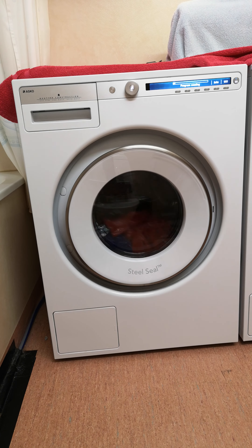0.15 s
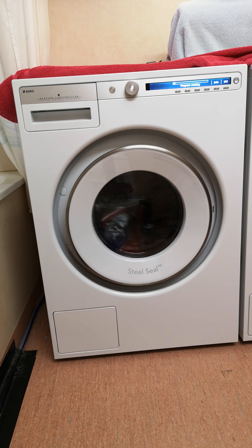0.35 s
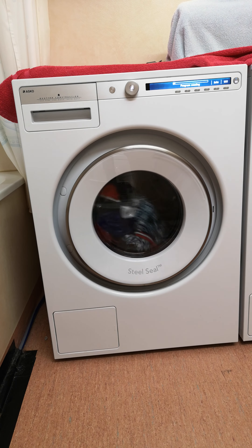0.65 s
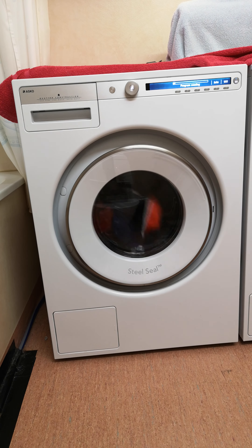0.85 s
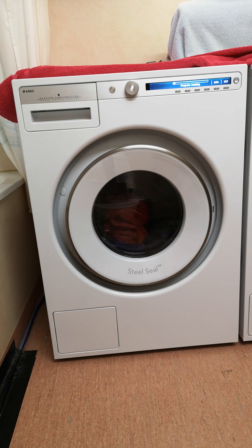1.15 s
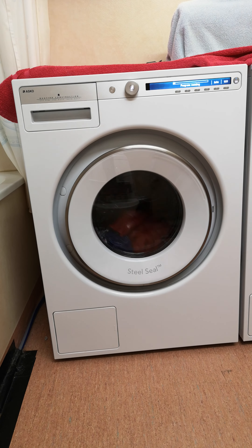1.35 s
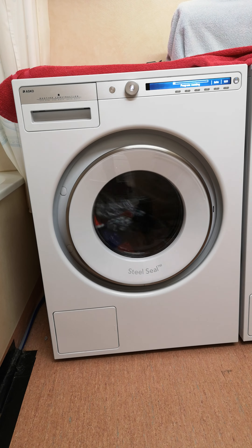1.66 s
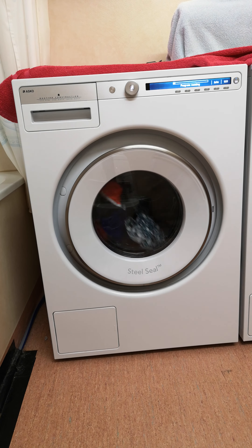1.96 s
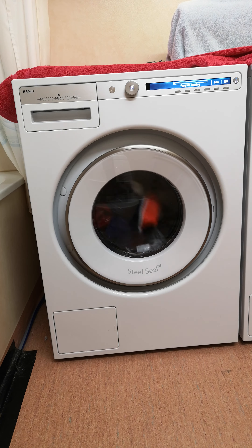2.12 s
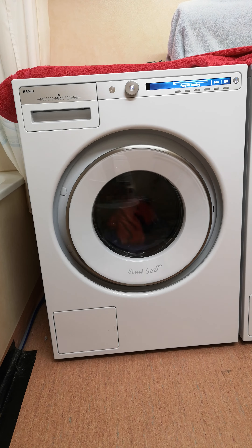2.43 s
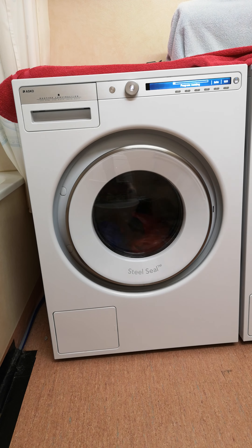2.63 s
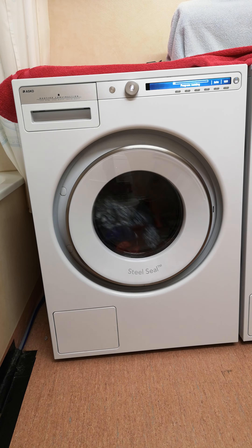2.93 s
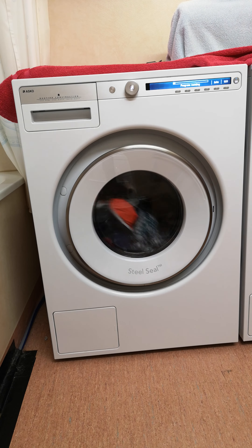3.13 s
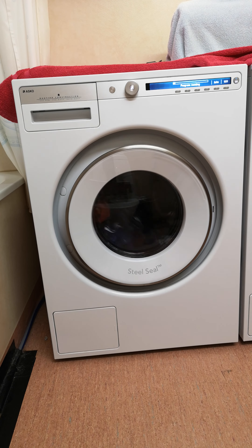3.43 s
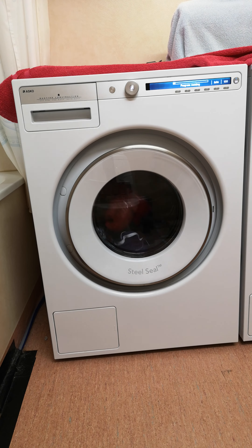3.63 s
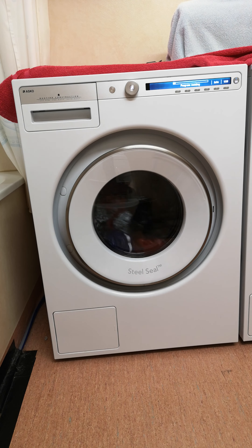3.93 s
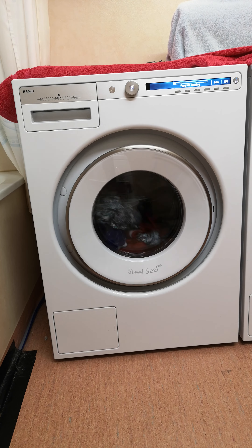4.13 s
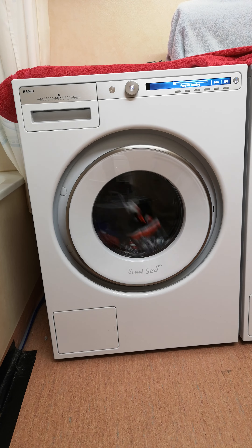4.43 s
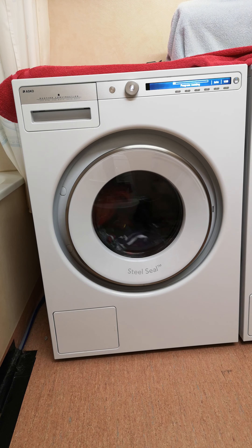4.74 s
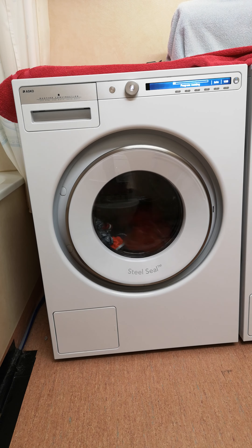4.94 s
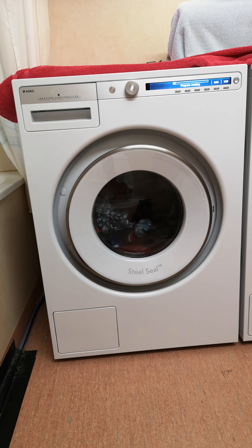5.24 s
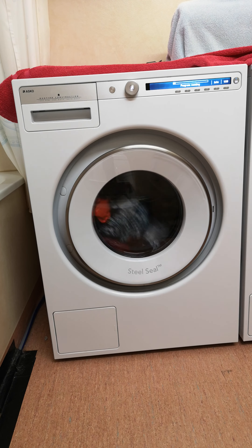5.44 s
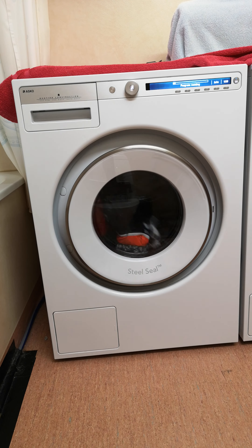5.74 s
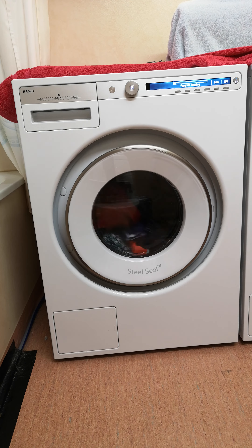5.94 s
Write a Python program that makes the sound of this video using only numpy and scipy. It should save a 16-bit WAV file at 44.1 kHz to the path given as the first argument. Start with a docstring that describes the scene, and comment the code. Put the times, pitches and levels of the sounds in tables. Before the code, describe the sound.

Close, small-room sound of a front-loader tumbling wet clothes. Rounded gurgling swishes rise and ebb irregularly without a real pause, muffled by the door and cabinet. Soft cloth thuds and a few flat slaps punctuate them, with the tub sometimes rocking in a brief low bump. Beneath is a constant deep electrical hum and rumble; above, a faint watery hiss. The machine leans clearly to the right, with a darker left side.

```python
"""A front-loading washing machine tumbles wet laundry, heard from a step away in a small room.
Water swishes and bubbles: noise and short rising rings, muffled by door and cabinet.
The motor hums in steady tones and the turning drum adds a low rumble under a fine hiss of spray.
Wet laundry thuds, slaps, and gives short squeaks and hisses, all brief swells of noise.
At times the tub rocks on its springs: a few deep cycles."""
import sys
import numpy as np
from scipy import signal
from scipy.fft import rfft, irfft, next_fast_len
from scipy.io import wavfile
from scipy.ndimage import uniform_filter1d

SR = 44100
rng = np.random.default_rng(int(sys.argv[2]) if len(sys.argv) > 2 else 0)


def generate_wav(sig):
    """Save sig (samples, or channels by samples) to the path in sys.argv[1] as 16-bit PCM at SR."""
    pcm = np.round(np.clip(np.atleast_2d(sig).T, -1, 1) * 32767).astype(np.int16)
    wavfile.write(sys.argv[1], SR, pcm)


N = 267863

# strength of the motor hum as the load shifts: time_s, level_db
HUM_LEVELS = [(0.0, -44), (0.03, -44.5), (0.15, -41.5), (0.56, -43), (0.78, -41), (1.0, -43.5), (1.05, -41),
              (2.23, -46.5), (2.45, -41.5), (2.65, -46), (3.35, -41), (3.46, -45.5), (3.9, -41.5),
              (4.11, -45.5), (4.22, -42.5), (4.33, -49.5), (4.45, -42), (4.8, -43.5), (4.87, -48),
              (4.99, -42.5), (5.17, -40.5), (5.9, -44), (5.97, -39.5), (6.07, -42)]
# weaker steady tones of the hum: multiple_of_mains_rate, level_db
HUM_LINES = [(1, -64.5), (4, -68.5), (6, -57.5)]
# laundry plunging through water: peak_s, gurgle_level_db, ebb_s (time to fall 10 dB), splash_above_gurgle_db
SWISHES = [(0.165, -40, 0.073, -3.5), (0.335, -51.5, 0.072, -2), (0.45, -35, 0.079, -12),
           (0.732, -38, 0.071, -5), (0.896, -34.5, 0.079, -9), (1.073, -38.5, 0.12, -5.5),
           (1.292, -41, 0.11, -10.5), (1.343, -35.5, 0.046, -8.5), (1.512, -50.5, 0.072, -2),
           (1.749, -39, 0.089, -8.5), (1.915, -45.5, 0.082, -6), (2.072, -52.5, 0.029, 2),
           (2.379, -36, 0.077, -8.5), (2.598, -46, 0.14, -9.5), (2.803, -43, 0.09, -9.5),
           (3.006, -49.5, 0.1, 0.5), (3.128, -37.5, 0.075, -5.5), (3.288, -43.5, 0.16, -12),
           (3.383, -49.5, 0.06, -1), (3.551, -37.5, 0.069, -10.5), (3.823, -42, 0.2, -9.5),
           (3.963, -42.5, 0.043, -10.5), (4.181, -43, 0.077, -11), (4.477, -38.5, 0.044, -4.5),
           (4.557, -42.5, 0.12, -7.5), (4.717, -37.5, 0.069, -5), (4.992, -43, 0.089, -4.5),
           (5.2, -42, 0.28, -13), (5.305, -43, 0.063, -6.5), (5.475, -43.5, 0.079, -9),
           (5.632, -37.5, 0.073, -4.5), (5.874, -32, 0.033, -9.5), (5.925, -41.5, 0.19, -8),
           (6.057, -41.5, 0.066, -6.5)]
# what the closed machine lets through of the water's noise: frequency_hz, gain_db
CABINET = [(30, -32), (85, -11), (140, 0.5), (200, -2), (265, 2.5), (450, -0.5), (800, 2.5), (1100, -10.5),
           (1900, -12.5), (2050, -17.5), (2650, -18.5), (3200, -34), (5000, -41), (12000, -57.5)]
# resonances and hollows of tub, door and panels: frequency_hz, width_hz, lift_db
PANELS = [(116, 11, -1), (159, 4.9, -2.5), (223.4, 21.5, -13.5), (281, 81, 4.5), (320.4, 3.6, -8),
          (575, 14, -2), (618, 11, -4), (722, 250, 2), (787, 38, 2.5), (940, 19, -1), (1036, 40, -0.5),
          (1183, 8.4, 0.5), (1251, 47, 2.5), (1329, 70, -5), (1414, 21, 3.5), (1496, 6.6, 7.5),
          (1550, 65, 3), (1725, 68, 7.5), (1831, 28.5, 11.5), (1952, 57, 2.5), (2610, 140, 4.5),
          (3210, 70, 10.5), (3690, 61, 10.5)]
# colour of the drum's rumble: frequency_hz, gain_db
RUMBLE_COLOUR = [(10, -9), (30, -15), (42, -13), (50, -0.5), (62, -8.5), (75, -2.5), (86, 2), (100, -2),
                 (112, -11), (145, -6), (200, -28), (500, -59)]
# colour of the spray: frequency_hz, gain_db
SPRAY_COLOUR = [(100, 1), (800, 2.5), (1900, 1), (2600, 1.5), (3200, -6.5), (5500, -9), (7500, -13.5),
                (10500, -19), (16000, -17.5)]
# ringing of the steel drum under the spray: frequency_hz, width_hz, lift_db
STEEL_RINGS = [(3684, 270, 11.5), (4970, 280, 5), (9090, 730, 8.5)]
# colour of the steady background of room and microphone: frequency_hz, gain_db
BACKGROUND_COLOUR = [(20, 2), (60, 11), (200, 2), (600, -6), (2000, 3.5), (5000, -4.5), (9000, -6.5),
                     (16000, -6)]
# wet cloth landing in the drum: peak_s, level_db (before the cabinet), length_s, pitch_hz
THUDS = [(.156, -35, 0.012, 305), (.441, -42, 0.027, 325), (.894, -40, 0.018, 345),
         (1.057, -37, 0.061, 307), (1.317, -39.5, 0.02, 440), (1.467, -41, 0.024, 315),
         (2.354, -37, 0.016, 307), (2.41, -40, 0.0098, 270), (3.095, -35, .012, 294),
         (3.6, -34, 0.019, 285), (3.667, -39, .012, 264), (3.886, -50, .01, 280), (4.128, -35, 0.0071, 295),
         (4.167, -37.5, .017, 280), (4.452, -37, 0.016, 290), (4.535, -40.5, 0.026, 302),
         (4.705, -31, 0.011, 305), (4.773, -35.5, 0.0051, 310), (4.99, -36, 0.028, 293),
         (5.21, -37, 0.051, 288), (5.315, -34, 0.0073, 278), (5.741, -37.5, 0.019, 268),
         (5.867, -27, .0093, 337), (5.936, -43.5, 0.017, 338)]
# soaked cloth slapping the water: peak_s, level_db (before the panels), length_s, pitch_hz
SLAPS = [(.447, -39, 0.024, 1320), (1.328, -47.5, 0.029, 1540), (1.722, -32, 0.026, 695),
         (2.357, -38, 0.021, 1700), (3.503, -37, 0.014, 760), (4.146, -39, 0.013, 715),
         (4.443, -42, 0.013, 1260), (4.688, -42.5, 0.011, 1740), (5.595, -38, 0.017, 1790),
         (5.852, -40, 0.0053, 1090)]
# the tub rocking on its springs: peak_s, level_db
TUB_ROCKS = [(0.723, -45), (1.114, -51), (1.332, -46.5), (2.359, -54), (2.574, -54), (3.396, -49),
             (3.799, -54), (5.209, -56), (5.863, -45), (5.994, -45)]
# short squeaks and hisses of wet laundry: peak_s, level_db, length_s, pitch_hz
SQUEAKS_AND_HISSES = [(1.335, -63, 0.05, 3600), (3.77, -62.5, 0.037, 3600), (4.302, -48.5, 0.0077, 1910)]
# the far microphone port against the near one: frequency_hz, gain_db, delay_ms
FAR_PORT = [(50, 0.2, 1.0), (100, -0.3, 0.99), (200, -1.9, 0.97), (300, -3.0, 0.95), (500, -5.6, 0.85),
            (800, -9.1, 0.76), (1100, -11.5, 0.71), (1800, -16.0, 0.64), (2600, -19.9, 0.61),
            (4000, -23.4, 0.6)]

MAINS_HZ = 50
TOP_HZ = 15750  # upper edge of the whole sound
# a swish swells in this share of its ebb time, and its splash runs just ahead of the gurgle
SWELL_SHARE, ROUNDNESS, SPLASH_LEAD_S = 0.76, 1.46, 0.013
# the water keeps lapping between the swishes
LAP_GURGLE_DB, LAP_SPLASH_DB = -54, -58.5
# usual level in dB, and dB gained per dB of moving water
SWIRL_DB, SWIRL_FOLLOW = -50, 0.44
RUMBLE_DB, RUMBLE_FOLLOW = -55.5, 0.32
SPRAY_DB, SPRAY_FOLLOW = -66.5, 0.32
# how far spray leans from gurgle to splash, and how much a busy spell around it adds
SPLASH_SHARE, SPELL_S, SPELL_FOLLOW = 0.47, 0.5, 0.15

TIME = np.arange(N) / SR
SIZE = next_fast_len(N + SR // 2, real=True)  # spare room so that ringing does not wrap round
HZ = np.fft.rfftfreq(SIZE, 1 / SR)


def gain_of(db):
    """Turn decibels into a plain multiplier."""
    return 10 ** (np.asarray(db) / 20)


def evened(x):
    """Scale to unit average strength (root mean square)."""
    return x / np.sqrt(np.mean(x ** 2) + 1e-20)


def steadied(x, span_s):
    """Hold unit level over every span, with the finer grain kept."""
    power = uniform_filter1d(x ** 2, max(int(span_s * SR), 2)).clip(0)
    return x / np.sqrt(power + 1e-12)


def curves(rows):
    """Each column of a time table, at every sample."""
    times, *columns = np.transpose(rows)
    return [np.interp(TIME, times, column) for column in columns]


def spectra(rows):
    """Each column of a frequency table, joined up along a log scale of frequency."""
    hz, *columns = np.transpose(rows)
    return [np.interp(np.log(HZ + 1), np.log(hz + 1), column) for column in columns]


def lifts(rows):
    """A row of resonances as a gain curve in dB."""
    return sum(db / (1 + (2 * (HZ - hz) / width) ** 2) for hz, width, db in rows)


def filtered(x, response):
    """Change the strength (and timing) of each frequency in a sound."""
    return irfft(rfft(x, SIZE) * response, SIZE)[..., :N]


def causal(db):
    """The minimum-phase response of a gain curve: it rings after a blow, never before."""
    cepstrum = irfft(np.log(gain_of(db)), SIZE)
    cepstrum[1:SIZE // 2] *= 2
    cepstrum[SIZE // 2 + 1:] = 0
    return np.exp(rfft(cepstrum))


def wander(rate_hz):
    """Random drift of unit size, smoother for a lower rate."""
    return evened(filtered(rng.standard_normal(N), np.exp(-(HZ / rate_hz) ** 2)))


def hum():
    """Magnetic pull shakes the motor at twice the mains rate, with a few weaker tones."""
    level_db, = curves(HUM_LEVELS)
    turns = MAINS_HZ * TIME + 0.00097 * wander(1)  # mains cycles so far, very slightly uneven
    out = gain_of(level_db) * np.sin(2 * np.pi * 2 * turns)
    for multiple, db in HUM_LINES:
        tone = np.sin(2 * np.pi * (multiple * turns + rng.random()))
        out += gain_of(db + 0.67 * wander(1.8)) * tone
    return np.sqrt(2) * out  # a sine of this height has the level given


def rumble(gurgle_db):
    """The loaded drum rolls on its bearings, a little louder when the water heaves."""
    roll = steadied(filtered(rng.standard_normal(N), gain_of(spectra(RUMBLE_COLOUR)[0])), 0.37)
    return roll * gain_of(RUMBLE_DB + RUMBLE_FOLLOW * (gurgle_db - gurgle_db.mean()))


def swish(age, ebb_s):
    """Power of one swish around its peak: a rounded swell and a slower ebb."""
    away = abs(age) / (ebb_s * np.where(age < 0, SWELL_SHARE, 1))
    return 10 ** -np.minimum(away ** ROUNDNESS, 20)


def heave():
    """Level of gurgle and of splash in dB: the swishes' power on top of the steady lapping."""
    gurgle, splash = gain_of(LAP_GURGLE_DB) ** 2, gain_of(LAP_SPLASH_DB) ** 2
    t = np.linspace(0, TIME[-1], N // 64)  # a coarse clock is enough for slow levels
    for peak_s, db, ebb_s, splash_db in SWISHES:
        gurgle = gurgle + gain_of(db) ** 2 * swish(t - peak_s, ebb_s)
        splash = splash + gain_of(db + splash_db) ** 2 * swish(t - peak_s + SPLASH_LEAD_S, ebb_s)
    return [np.interp(TIME, t, 10 * np.log10(power)) for power in (gurgle, splash)]


def bubbles(per_s, cycles, glide, spread_db, count=36):
    """Short rising rings of many pitches, mostly small and now and then large."""
    out = np.zeros(N)
    for hz in np.geomspace(300, 4000, count):
        u = np.arange(int(5 * cycles / hz * SR)) / SR * hz / cycles  # age in units of the decay time
        swell_and_fade = (1 - np.exp(-8 * u)) * np.exp(-u)
        ring = swell_and_fade * np.sin(2 * np.pi * cycles * (u + glide * u ** 2))
        sizes = gain_of(spread_db * np.minimum(rng.exponential(1, N), 4))
        pops = sizes * (rng.random(N) < per_s / count / SR)
        out += np.sqrt(hz) * evened(signal.oaconvolve(pops, ring)[:N])
    return evened(out)


def water(gurgle_db, splash_db):
    """Churning noise, fine bubbles and stray plops ring the cabinet, in three bands with their own levels."""
    churn = evened(rng.standard_normal(N) * gain_of(1.33 * wander(42)))
    fizz = gain_of(-7.0) * bubbles(per_s=3500, cycles=3.4, glide=0.018, spread_db=2.5)
    plops = gain_of(-11.5) * bubbles(per_s=130, cycles=8.84, glide=0.0296, spread_db=2.5)
    sound = filtered(churn + fizz + plops, causal(spectra(CABINET)[0] + lifts(PANELS)))
    above_bass = 1 / (1 + (385 / (HZ + 1)) ** 8)
    above_middle = 1 / (1 + (1120 / (HZ + 1)) ** 8)
    swirl = steadied(filtered(sound, 1 - above_bass), 0.089)
    gurgle = steadied(filtered(sound, above_bass - above_middle), 0.071)
    splash = steadied(filtered(sound, above_middle), 0.091)
    # the deep swirl follows the heave only in part, so it never rests
    swirl_db = SWIRL_DB + SWIRL_FOLLOW * (gurgle_db - gurgle_db.mean())
    return gain_of(swirl_db) * swirl + gain_of(gurgle_db) * gurgle + gain_of(splash_db) * splash


def hiss(gurgle_db, splash_db):
    """Moving water throws spray on the steel drum, over a steady background: both unlike at the two ports."""
    throw_db = gurgle_db + SPLASH_SHARE * (splash_db - gurgle_db)
    throw_db = throw_db - throw_db.mean()
    spell_db = uniform_filter1d(throw_db, int(SPELL_S * SR))
    spray_db = SPRAY_DB + SPRAY_FOLLOW * throw_db + SPELL_FOLLOW * spell_db + 0.52 * wander(11)
    # rows are far port, near port: only the near one faces the ringing drum
    colour_db = spectra(SPRAY_COLOUR)[0] + np.outer([0, 1], lifts(STEEL_RINGS))
    spray = evened(filtered(rng.standard_normal((2, N)), gain_of(colour_db)))
    background = evened(filtered(rng.standard_normal((2, N)), gain_of(spectra(BACKGROUND_COLOUR)[0])))
    spray = spray * gain_of(spray_db) * gain_of([[-1.3], [0]])
    return spray + background * gain_of([[-76.5], [-77.5]])


def bursts(rows, rise, fall, width, size=16384):
    """Short swells of noise, each round its own pitch; the bandwidth is a share of that pitch."""
    out = np.zeros(N + 2 * size)
    age = (np.arange(size) - size // 2) / SR
    hz = np.fft.rfftfreq(size, 1 / SR) + 1
    for (peak_s, db, length, pitch), noise in zip(rows, rng.standard_normal((len(rows), size))):
        # a larger rise or fall makes that side of the peak shorter than the length
        shape = np.exp(-np.where(age < 0, rise, fall) * abs(age) / length)
        band = 1 / (1 + ((hz / pitch - pitch / hz) / width) ** 2)
        burst = steadied(irfft(rfft(noise) * band), 0.013) * shape
        level = gain_of(db) * np.linalg.norm(shape) / np.linalg.norm(burst)
        out[round(peak_s * SR):][:size] += level * burst
    return out[size // 2:][:N]


def thuds():
    """Cloth lands with a dull blow; the cabinet holds back its deepest part."""
    held_db = -10 * np.log10(1 + (235 / (HZ + 1)) ** 12)
    cabinet = causal(np.maximum(held_db, -7) - .3)
    return filtered(bursts(THUDS, rise=0.83, fall=0.66, width=0.45), cabinet)


def slaps():
    """Flat cloth meets the water abruptly, and the smack dies away through the panels."""
    return filtered(bursts(SLAPS, rise=2.3, fall=1.0, width=0.3), causal(lifts(PANELS) - 2.8))


def tub(ring_hz, swell_s):
    """The tub rocks on its springs for a few deep cycles, each time at a slightly different pitch."""
    out = np.zeros(N)
    for (peak_s, db), (phase, detune) in zip(TUB_ROCKS, rng.random((len(TUB_ROCKS), 2))):
        age = np.maximum((TIME - peak_s) / swell_s + 2, 0) / 2  # 1 at the peak
        swell = (age * np.exp(1 - age)) ** 2
        hz = ring_hz * (1 + .1 * (detune - .5))
        out += np.sqrt(2) * gain_of(db) * swell * np.sin(2 * np.pi * (hz * TIME + phase))
    return out


def squeaks_and_hisses():
    """Short squeaks and hisses of wet laundry: noise in a narrow band."""
    return bursts(SQUEAKS_AND_HISSES, rise=0.54, fall=0.8, width=0.16)


def rung(x, t60, wet_db):
    """Drum and room ring on briefly: dense echoes that fall 60 dB in t60 seconds."""
    age = np.arange(SR // 2) / SR
    tail = rng.standard_normal(len(age)) * gain_of(-60 * age / t60) * (age > .004)
    wet = signal.oaconvolve(x, tail / np.linalg.norm(tail))[:N]
    return (x + gain_of(wet_db) * wet) / np.sqrt(1 + gain_of(wet_db) ** 2)


def scene():
    """The machine reaches the left port later and duller than the right one."""
    gurgle_db, splash_db = heave()
    laundry = water(gurgle_db, splash_db) + thuds() + slaps() + squeaks_and_hisses()
    laundry = rung(laundry, t60=0.13, wet_db=-10)
    near = hum() + rumble(gurgle_db) + tub(ring_hz=83, swell_s=0.028) + laundry
    shade_db, delay_ms = spectra(FAR_PORT)
    delay = np.exp(-2j * np.pi * HZ * delay_ms / 1000)
    far = filtered(near, gain_of(shade_db) * delay)
    return np.array([far, near]) + hiss(gurgle_db, splash_db)


def record(dry):
    """A steep low-pass filter takes away the highest treble."""
    low_pass = signal.firwin(511, TOP_HZ, window=("kaiser", 9), fs=SR)
    return signal.oaconvolve(dry, low_pass[None], "same")


dry = scene()
out = record(dry)
generate_wav(out)
```